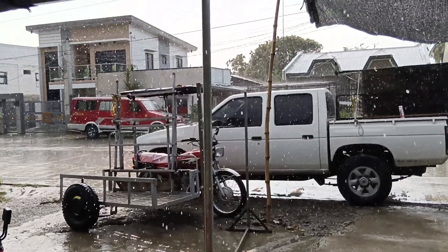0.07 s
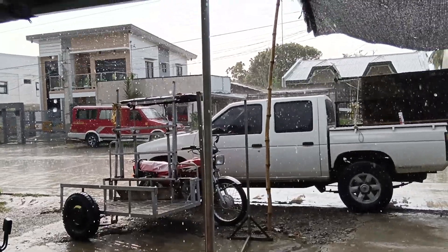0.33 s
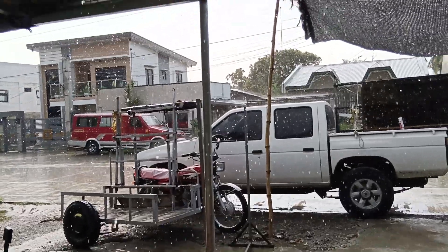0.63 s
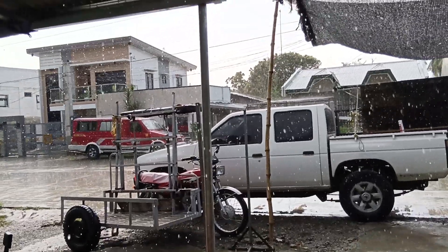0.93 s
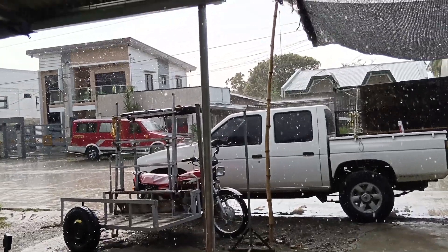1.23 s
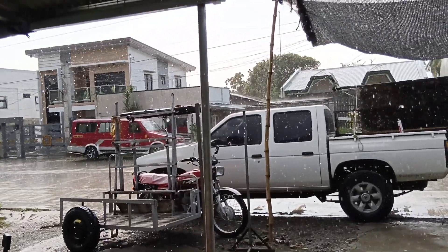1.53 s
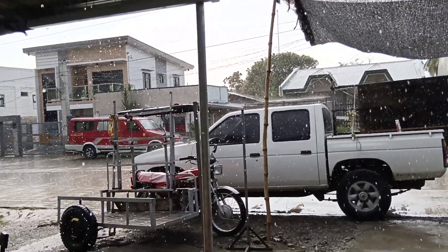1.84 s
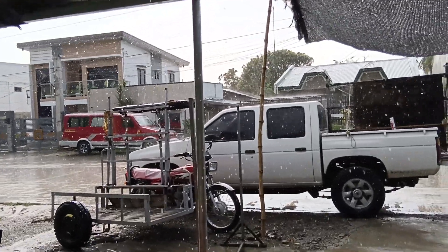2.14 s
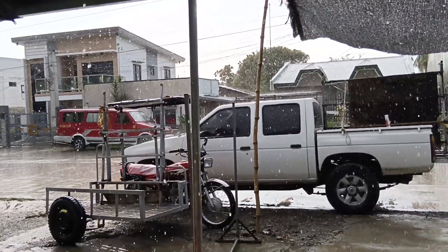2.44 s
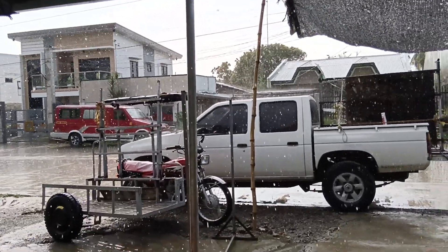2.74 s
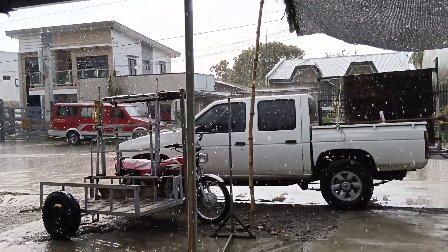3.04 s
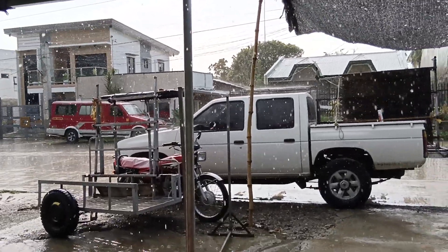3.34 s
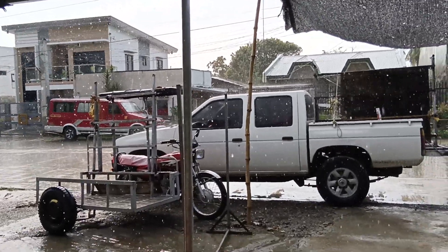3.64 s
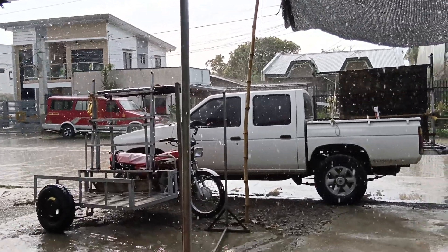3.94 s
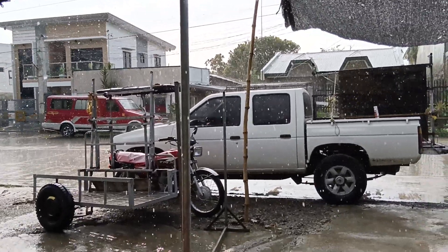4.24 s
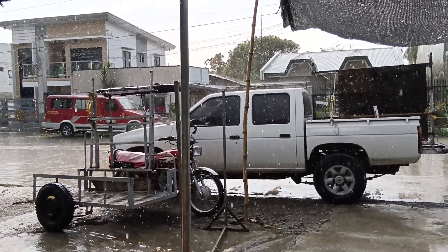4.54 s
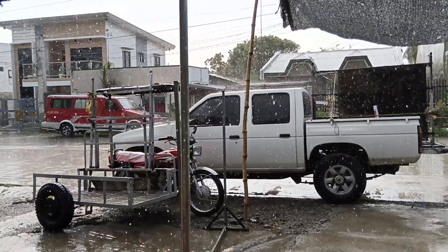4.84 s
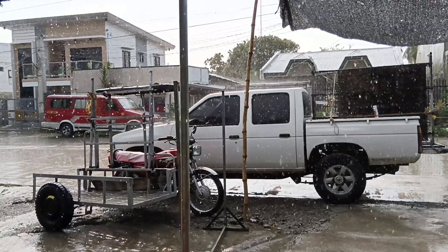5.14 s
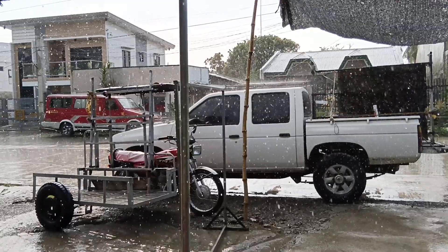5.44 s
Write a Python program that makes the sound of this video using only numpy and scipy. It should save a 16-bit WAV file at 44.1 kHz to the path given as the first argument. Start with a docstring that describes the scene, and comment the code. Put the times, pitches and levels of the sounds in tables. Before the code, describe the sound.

Rain falls on a concrete yard, with splattering run-off and dull, hollow drips on a cloth awning above.

```python
"""A wet concrete yard in steady rain, heard from under a cloth awning.
Countless far drops merge into a hiss; near ones tick and trap tiny ringing bubbles in the puddles.
Run-off splatters on the ground to the left, and drops drum softly on the cloth overhead to the right.
A faint rumble lies underneath, and the rain grows a little heavier towards the end."""
import sys
import numpy as np
from scipy import signal
from scipy.fft import rfft, irfft, next_fast_len
from scipy.io import wavfile

SR = 44100
rng = np.random.default_rng(int(sys.argv[2]) if len(sys.argv) > 2 else 0)


def bounce(signal):
    """Save signal as a 16-bit WAV file at the path given by the first command-line argument."""
    frames = np.transpose(np.atleast_2d(signal))
    limited = np.clip(frames, -1, 1)
    pcm = np.round(limited * 32767).astype(np.int16)
    wavfile.write(sys.argv[1], SR, pcm)


N = 250488
TIME = np.arange(N) / SR

# The bright tone of droplets landing nearby. Each row: frequency in Hz, relative level in dB.
SPRAY_TONE = [(300, -43), (1200, -13), (3000, 11.5), (4300, 0.5), (5600, 5.5), (8000, -8), (10500, -15),
              (12200, -7), (16000, -13)]
# The dull tone of a tap on the cloth. Each row: frequency in Hz, relative level in dB.
TAP_TONE = [(100, -41.5), (215, -32), (280, -12), (350, -5.5), (480, -1), (590, -2), (700, 0.5), (950, 0),
            (1300, -7), (2000, -4.5), (4000, -38.5), (8000, -50)]


def from_db(db):
    """Turn decibels into a number to multiply a sound by."""
    return 10 ** (np.asarray(db) / 20)


def rms_one(x):
    """Scale a signal so that its average strength (rms) is 1."""
    return x / np.sqrt(np.mean(x ** 2) + 1e-20)


def pan(left_db):
    """Left and right gains that make the left side louder by left_db."""
    return from_db(np.array([[.5], [-.5]]) * left_db)


def in_time(rows):
    """Join rows of time and value by straight lines."""
    return np.interp(TIME, *np.transpose(rows))


def at_hz(rows, hz):
    """Read between rows of frequency and value, giving each octave equal room."""
    table = np.array(rows)
    return np.interp(np.log(hz + 1), np.log(table[:, 0]), table[:, 1])


def drift(per_s):
    """A smooth random curve that strays about 1 either way; per_s sets its pace."""
    step, warm_up = 40, 2000  # samples per point; points thrown away at the start
    keep = np.exp(-2 * np.pi * per_s * step / SR)
    noise = rng.standard_normal(N // step + warm_up + 2)
    slow = signal.lfilter([1], [1, -2 * keep, keep * keep], noise)[warm_up:]
    return np.interp(np.arange(N) / step, np.arange(len(slow)), rms_one(slow))


def colour(x, tone, side=None):
    """Filter a sound to a tone table; a side table leans each frequency left or right."""
    size = 2 * next_fast_len(N // 2 + 1)
    hz = np.arange(size // 2 + 1) * SR / size
    gain = from_db(at_hz(tone, hz)) * pan(at_hz(side, hz) if side else 0)
    # fold the filter so that it rings only after each click, never before (minimum phase)
    cepstrum = irfft(np.log(rms_one(gain)))
    cepstrum[:, 1:size // 2] *= 2
    cepstrum[:, size // 2 + 1:] = 0
    response = np.exp(rfft(cepstrum))
    return irfft(rfft(x, size) * response, size)[:, :N]


def impacts(per_s, spread_db, bearing=0., width=1.):
    """Random clicks of uneven size that reach the nearer side first (bearing -1 is left, +1 is right)."""
    side_to_side_s = .00047
    at = np.flatnonzero(rng.random(N) < per_s / SR)
    size_db = spread_db * np.minimum(rng.exponential(1, len(at)), 4)
    size = from_db(size_db) * rng.choice([-1, 1], len(at))
    direction = bearing + width * rng.uniform(-1, 1, len(at))
    lag = np.round(side_to_side_s * SR * direction).astype(int)
    left = np.bincount((at + lag) % N, size, N)
    right = np.bincount(at, size, N)
    return rms_one(np.array([left, right]))


def bursts(events, rise_s, decay_s):
    """A loudness curve that swells and dies away for each row of time in seconds and level in dB."""
    out = np.zeros(N)
    for s, db, *_ in events:
        age = np.maximum(TIME - s + rise_s, 0)
        out += from_db(db) * (1 - np.exp(-age / rise_s)) * np.exp(-age / decay_s)
    return out


def notes(events, rise_s, decay_s):
    """A short dying note for each row of time in seconds, level in dB and pitch in Hz."""
    return sum(bursts([(s, db)], rise_s, decay_s) * np.sin(2 * np.pi * hz * (TIME - s))
               for s, db, hz in events)


def rumble():
    """A faint rumble wavers and bumps, alike on both sides; softer air stirs on each side separately."""
    # The deep tone of the rumble. Each row: frequency in Hz, relative level in dB.
    rumble_tone = [(20, -15), (45, -18), (70, -4.5), (95, 0.5), (135, -4.5), (165, -2.5), (200, -10.5),
                   (400, -32), (1500, -57)]
    # Soft bumps that stand out of it. Each row: time in seconds, relative level in dB.
    bumps = [(0.16, -56), (0.62, -46), (1.15, -49), (1.44, -49), (1.93, -52), (2.18, -51), (2.85, -46),
             (3.32, -60), (3.55, -55), (3.72, -50), (4.47, -46.5), (5.52, -44)]
    # The tone of the stirring air. Each row: frequency in Hz, relative level in dB.
    air_tone = [(30, -13), (70, 1), (200, 5), (1000, -44)]
    level = from_db(-64.5 + 4 * drift(per_s=6)) + bursts(bumps, rise_s=0.022, decay_s=0.043)
    far = level * colour(rng.standard_normal((1, N)), rumble_tone)
    air = from_db(-76.0) * colour(rng.standard_normal((2, N)), air_tone)
    return far + air * from_db(6.8 * drift(per_s=3.4))


def awning():
    """The slack cloth turns drops into dull taps, and bigger drops make it ring. Both come in flurries."""
    # How hard the rain drums on the cloth. Each row: time in seconds, level in dB.
    drumming = [(0.0, -33), (0.5, -33), (1.05, -34), (1.28, -33), (1.72, -35.5), (1.97, -33), (2.5, -34),
                (3.08, -34), (3.26, -35.5), (3.5, -32), (3.75, -34), (3.98, -34.5), (4.7, -33), (5.2, -33),
                (5.68, -31.2)]
    # Which way the taps lean. Each row: frequency in Hz, left minus right in dB.
    tap_side = [(280, -2.5), (410, 2.5), (580, -4), (750, -3), (1000, 1), (2000, 0.5)]
    # The hollow ring of the cloth. Each row: frequency in Hz, relative level in dB.
    ring_tone = [(100, -46), (215, -25), (265, -12), (305, -3), (340, 2), (400, -3), (460, -7), (600, -19),
                 (1500, -47)]
    overhead = from_db(-1.5) * impacts(per_s=6000, spread_db=2.6, width=0.77)
    right_patch = from_db(-3.5) * impacts(per_s=2500, spread_db=0.6, bearing=0.79, width=0.14)
    taps = colour(overhead + right_patch, TAP_TONE, tap_side)
    big_drops = impacts(per_s=900, spread_db=1.3, bearing=.2, width=0.6)
    ring = colour(big_drops, ring_tone) * pan(left_db=1.0)
    level_db = in_time(drumming)
    flurries_per_s, ring_follow = 5.5, 2.2  # the ring gains 2.2 dB for each dB of drumming
    taps_db = level_db + 0.6 * drift(flurries_per_s)
    ring_db = -43 + ring_follow * (level_db - np.mean(level_db)) + 3 * drift(flurries_per_s)
    return from_db(taps_db) * taps + from_db(ring_db) * ring


def drips():
    """Heavy drips slap the awning and set the wet cloth ringing with short hollow notes."""
    # Drips on the cloth. Each row: time in seconds, relative level in dB, pitch of the cloth in Hz.
    thuds = [(0.579, -28.5, 540), (0.679, -22, 804), (1.264, -23.5, 373), (2.099, -25, 314),
             (2.579, -21, 693), (2.819, -18.5, 947), (3.022, -24, 382), (3.379, -23, 1016),
             (3.72, -26, 318), (3.798, -26, 343), (5.239, -23.5, 496), (5.329, -26, 884), (5.489, -22, 866)]
    patter = impacts(per_s=3500, spread_db=4.0, bearing=0.64, width=.3)
    slaps = bursts(thuds, rise_s=0.0066, decay_s=0.037) * patter
    hollow_notes = notes(thuds, rise_s=0.0074, decay_s=0.021)
    return from_db(-3.5) * hollow_notes + from_db(-5.6) * colour(slaps, TAP_TONE)


def run_off():
    """Gathered water falls on the left, each time with a spray of droplets and the plink of one bubble."""
    # Water landing on the concrete. Each row: time in seconds, relative spray level in dB,
    # bubble pitch in Hz, relative bubble level in dB.
    splats = [(0.1805, -34, 3270, -37), (1.1648, -28.5, 2320, -33), (2.1034, -28, 2340, -30),
              (2.5488, -28, 3080, -28), (3.35, -30, 2540, -33), (3.69, -29, 2770, -24.5),
              (3.7893, -25, 2820, -21.5), (4.242, -26.5, 2550, -37), (4.3191, -30.5, 2880, -32),
              (4.9394, -30, 2160, -30), (5.0516, -25.5, 3280, -30), (5.5625, -25.5, 2360, -34)]
    spray = bursts(splats, rise_s=0.002, decay_s=0.03) * impacts(per_s=9000, spread_db=4.5)
    plinks = notes([(s, db, hz) for s, _, hz, db in splats], rise_s=0.0036, decay_s=0.024)
    return from_db(-2.5) * (colour(spray, SPRAY_TONE) + plinks) * pan(left_db=12.6)


def splashes(level_db):
    """Big drops all around shatter into showers of droplets; some land close by with a fine wet tick."""
    # The tone of the finest, brightest droplets. Each row: frequency in Hz, relative level in dB.
    droplet_tone = [(500, -38), (2800, 2), (4300, -2), (5600, -0.5), (8000, -7.5), (10500, -9), (12200, -4),
                    (16000, -7)]
    fade_s = .011  # how quickly the energy of each shower dies away
    big_drops = impacts(per_s=42, spread_db=2.1) ** 2
    energy = signal.lfilter([1], [1, -np.exp(-1 / (fade_s * SR))], big_drops + 1e-18)
    showers = rms_one(np.sqrt(energy) * impacts(per_s=7000, spread_db=2.0))
    droplets = from_db(-16.5) * colour(showers, droplet_tone)
    close_ticks = from_db(-19.5) * colour(impacts(per_s=250, spread_db=8.5), SPRAY_TONE)
    return from_db(level_db) * (droplets + close_ticks) * pan(left_db=4.7)


def bubbles(per_s, cycles, low_hz, high_hz, pitches=18):
    """Air trapped by drops in the puddles rings briefly, at a pitch set by the size of the bubble."""
    out = np.zeros((2, N))
    for hz in np.geomspace(low_hz, high_hz, pitches):
        decay = from_db(-60 * hz / (cycles * SR))  # the ring falls 60 dB over the given cycles
        angle = 2 * np.pi * hz / SR
        drops = impacts(per_s / pitches, spread_db=1.0) + 1e-18
        ringing = signal.lfilter([1, 0, -1], [1, -2 * decay * np.cos(angle), decay * decay], drops)
        out += rms_one(ringing)
    return rms_one(out)


def yard_rain(level_db):
    """Far drops merge into a hiss; nearer ones tick in flurries and bubble in the puddles."""
    # The tone of rain on the wet ground. Each row: frequency in Hz, relative level in dB.
    ground_tone = [(200, -47), (450, -19.5), (950, -1.5), (1380, -3.5), (1700, -0.6), (2200, 0.73),
                   (3200, -5), (3750, -5.5), (4300, -13.5), (5400, -10), (8000, -23.5), (10500, -23.5),
                   (12100, -19.5), (15800, -25.5)]
    # The open yard lies to the left. Each row: frequency in Hz, left minus right in dB.
    yard_side = [(600, 1), (1000, 4), (1350, 0.5), (1800, 7), (2400, 6.5), (3200, 11.5), (4300, 6),
                 (5400, 8.5), (7800, 6.5), (9400, -0.5), (10800, -1), (12200, 0.5), (15000, 5.5)]
    hiss = from_db(-1.13) * rng.standard_normal((2, N))
    ticks = from_db(-7.5) * impacts(per_s=10000, spread_db=2.5) * from_db(drift(per_s=11))
    # heavier rain traps far more bubbles, so it sounds brighter
    bubbling_db = -17.0 + 1.1 * (level_db - np.mean(level_db)) + 2.8 * drift(per_s=7.0)
    puddles = from_db(bubbling_db) * bubbles(per_s=1200, cycles=40, low_hz=2280, high_hz=3427)
    # the rain thickens on the left as time passes
    left_db = np.interp(TIME, [0, 5.68], [-.7, .9])
    return from_db(level_db) * colour(hiss + ticks + puddles, ground_tone, yard_side) * pan(left_db)


def scene():
    """Rain on the ground and on the awning, over a low rumble."""
    # How hard the rain falls on the ground. Each row: time in seconds, relative level in dB.
    rain_strength = [(0.0, -25), (0.12, -26), (1.7, -27), (3.1, -26), (4.4, -26.0), (5.0, -25),
                     (5.42, -23.5), (5.68, -24)]
    ground_db = in_time(rain_strength)
    ground = yard_rain(ground_db) + splashes(ground_db) + run_off()
    overhead = awning() + drips()
    return ground + overhead + rumble()


def record(dry):
    """Cut away the very highest treble with a steep filter."""
    cutoff_hz = 15750
    return signal.sosfilt(signal.ellip(14, .1, 80, cutoff_hz, fs=SR, output="sos"), dry)


dry = scene()
out = record(dry)
bounce(out)
```